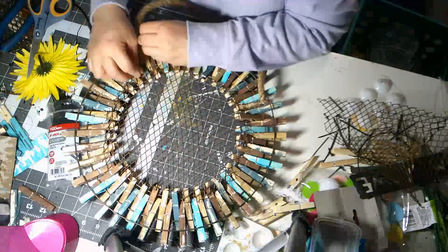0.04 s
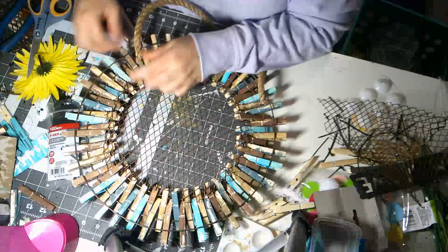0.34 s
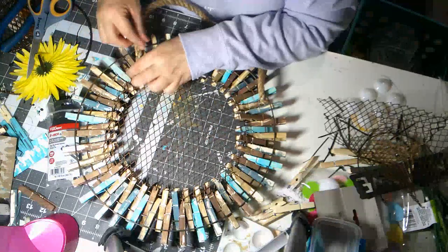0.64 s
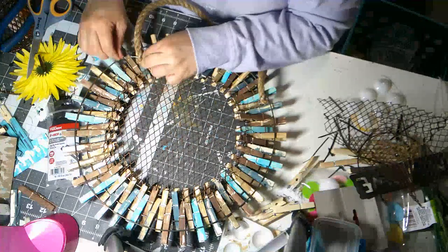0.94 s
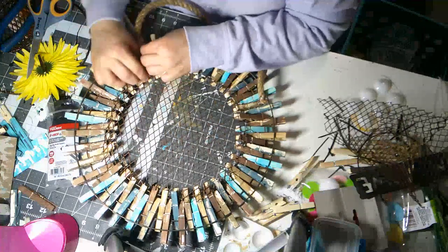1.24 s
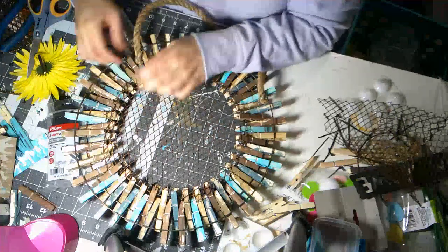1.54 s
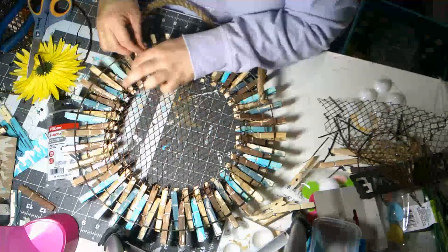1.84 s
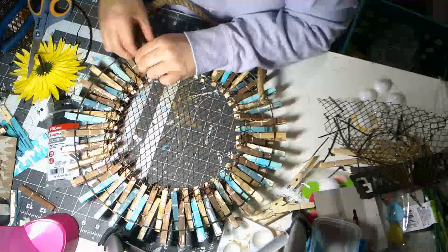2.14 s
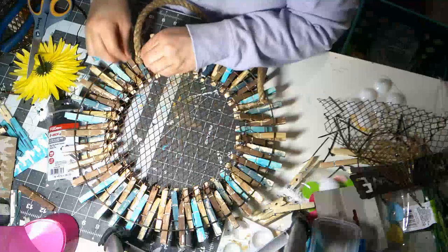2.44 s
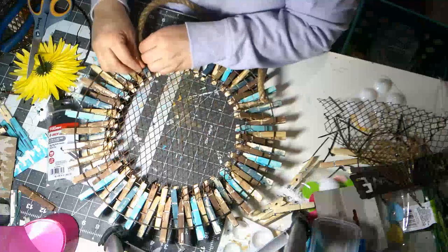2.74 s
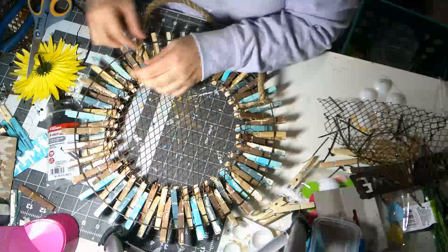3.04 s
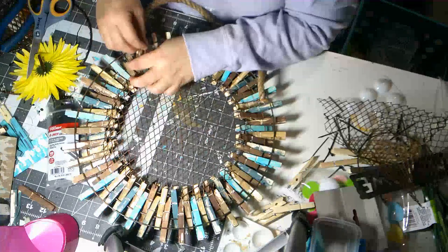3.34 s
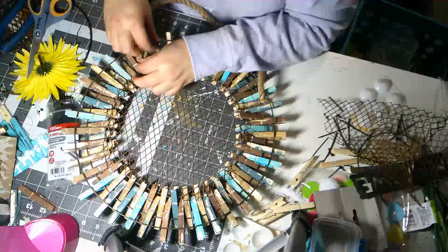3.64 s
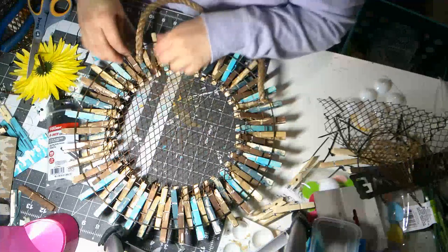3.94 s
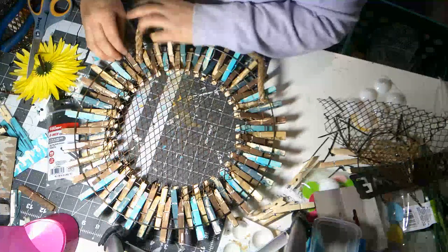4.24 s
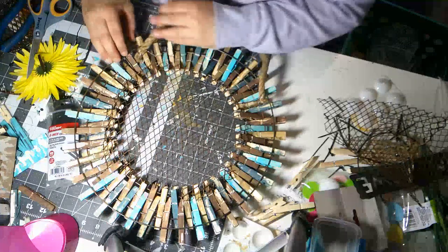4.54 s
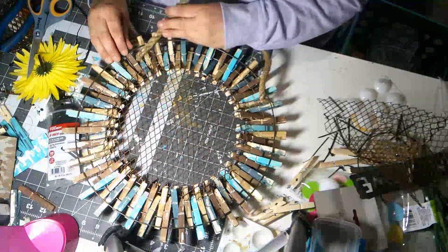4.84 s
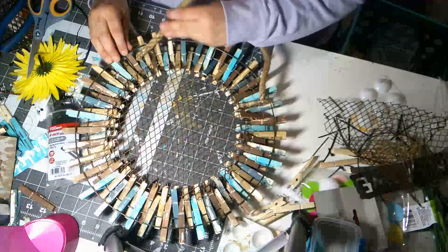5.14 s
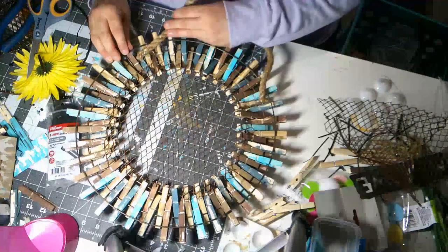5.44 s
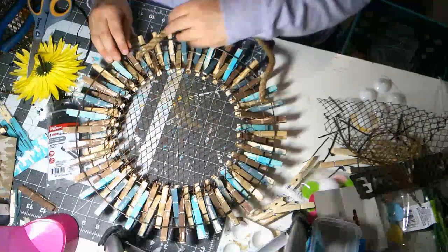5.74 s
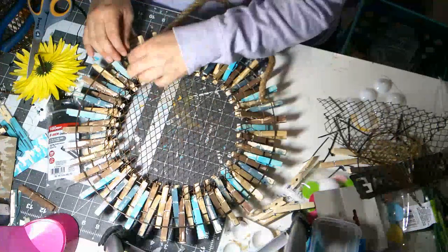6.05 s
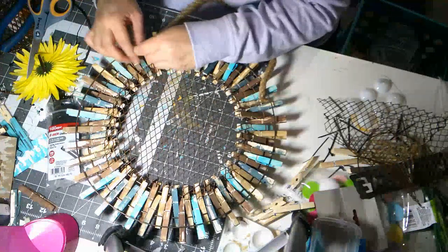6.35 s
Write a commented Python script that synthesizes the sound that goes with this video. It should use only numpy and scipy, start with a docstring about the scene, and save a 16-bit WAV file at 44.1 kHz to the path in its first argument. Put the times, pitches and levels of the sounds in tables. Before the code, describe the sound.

Hands weave a rope between wooden clothespins on a wire ring. The pegs give small hollow knocks and dry clicks in irregular clusters, with faint spring ticks, while the ring bumps dully on the table. Between the knocks, the rope rubs softly and the rocking ring rumbles. The room is small and quiet, with a low murmur, and the microphone sounds dull, with a thin hiss.

```python
"""Dull bumps and small wooden clacks sound in a small room: hands weave a rope between clothespins
clipped to a wire ring on a work table. The ring bumps the table top and excites its low modes;
the pegs collide and ring briefly, and their steel springs tick. The rope rubs along the wood by
stick-slip friction while the ring rocks. Under it all lie a low room murmur and a thin electronic hiss."""
import sys
import numpy as np
from scipy import signal
from scipy.fft import rfft, irfft, next_fast_len
from scipy.io import wavfile
from scipy.ndimage import uniform_filter1d

SR = 44100
rng = np.random.default_rng(int(sys.argv[2]) if len(sys.argv) > 2 else 0)


def transcribe(u):
    """Save the signal u as a 16-bit wav file named by the first command-line argument.

    u: samples, shape (n,) or (channels, n), limited to [-1, 1]; the rate is SR.
    q: integer samples, one column per channel.
    """
    v = np.clip(np.atleast_2d(u).T, -1, 1)
    q = np.round(v * 32767).astype(np.int16)
    wavfile.write(sys.argv[1], SR, q)


N = 291177
TIME = np.arange(N) / SR
ROOM_T60_S = 0.27


# Ring and hands bump the table. Each row: time in seconds, level of the push in dB,
# contact frequency in Hz (low is soft and slow), decay of the judder in cycles.
TABLE_BUMPS = [(0.592, -47, 242, 1.5), (0.853, -37, 63, 1.15), (0.903, -39, 214, 1.3),
               (0.933, -40.5, 106, 0.36), (1.064, -36.5, 71.4, 0.51), (1.118, -22.5, 68.2, 0.23),
               (1.121, -28.5, 211, 0.55), (1.287, -39.5, 82.6, 0.96), (1.86, -42, 191, 1),
               (1.93, -29.5, 189.6, 2.15), (1.969, -38, 73.4, 6.5), (2.026, -44.5, 199, 2),
               (2.456, -30, 422, 2.5), (2.465, -30.5, 229, 0.23), (2.493, -28.5, 63, 0.91),
               (2.528, -25, 64, 0.5), (2.481, -39, 400, 0.68), (2.532, -40.5, 252, 1.7),
               (2.815, -42.5, 245.5, 4.6), (3.049, -54, 214, 5.3), (3.103, -51, 204, 1.4),
               (3.42, -42.5, 131, 0.29), (3.757, -41.5, 210, 0.41), (3.779, -43, 64, 3.2),
               (3.853, -36, 123, 0.73), (3.869, -42, 253, 0.64), (4.184, -33, 231, 0.27),
               (4.228, -40.5, 73.8, 2.4), (4.36, -44.5, 234, 1.8), (4.506, -43.5, 215, 0.88),
               (4.676, -34.5, 166, 1.4), (4.687, -37, 84.6, 1.8), (5.323, -37.5, 184, 1.1),
               (5.336, -35.5, 150, 0.79), (5.352, -30, 65, 1.6), (5.383, -44, 139, 1.5),
               (5.56, -21.5, 232, 0.16), (5.561, -37, 440, 0.52), (6.119, -48, 318, 6.1),
               (6.198, -40.5, 258, 1.7), (6.216, -41, 66, 2.7), (6.272, -48, 310, 2)]
def bumps():
    """Soft impact: the air follows the acceleration of a bell-shaped push; then the wire ring judders."""
    push = np.zeros(N)
    for s, db, hz, judder_cycles in TABLE_BUMPS:
        near = (TIME > s - .05) & (TIME < s + .4)
        cycles = np.maximum((TIME[near] - s) * hz, -2)
        exponent = (np.pi * cycles) ** 2
        acceleration = (1 - 2 * exponent) * np.exp(-exponent)
        onset = (1 + np.tanh(2 * np.pi * (cycles - .5))) / 2
        judder = onset * np.cos(2 * np.pi * cycles) * np.exp(-cycles / max(judder_cycles, 1 / 4))
        push[near] += from_db(db) * (acceleration + judder)
    reflections = unit_energy(rng.standard_normal(SR // 2) * decay(ROOM_T60_S) * (1 - decay(0.05)))
    return table_top(push) + from_db(-1.0) * convolve(push, reflections)


# Modes of the table top. Each row: frequency in Hz, gain in dB, time to decay by 60 dB (T60) in seconds.
TABLE_MODES = [(64.7, 0.5, 0.84), (111, -11, 0.66), (127.9, 11, 0.33), (171.7, 3, 0.13), (201.8, 1.5, 0.2),
               (232.1, 8, 0.35), (313.6, 3, 0.24), (333, -7, 0.3), (399.5, 3.5, 0.16), (523.6, 1.5, 0.2)]
def table_top(force):
    """Forced vibration: the top passes a push on directly and resonates at each of its modes."""
    out = force.copy()
    for hz, db, t60 in TABLE_MODES:
        radius = np.exp(-np.log(1000) / (t60 * SR))
        gain = (1 - radius ** 2) / 2
        feedback = [1, -2 * radius * np.cos(2 * np.pi * hz / SR), radius ** 2]
        out += from_db(db) * signal.lfilter([gain, 0, -gain], feedback, force + 1e-18)
    return out


# A clack is a graze, the firm hit, and the peg falling back against its neighbour.
# Each row: time after the hit in seconds, level offset in dB.
CLACK_CONTACTS = [(-0.02, -24), (0, -3), (0.019, -16)]
# Pegs collide. Each row: time in seconds, base levels of hollow knock and dry click in dB, swell in
# seconds (short is a hit, long a scuff), spring tick as a share of the click, peg pitch in Hz,
# base level of its prongs in dB, cutoffs of the click and of the knock in Hz (low is a soft contact).
PEG_CLACKS = [(0.060, -59.5, -84, 0.0048, 0.15, 2190, -92, 3200, 1190),
              (0.120, -61.5, -75, 0.0036, 0.1, 2250, -78, 3000, 1000),
              (0.538, -60, -81, 0.005, 0.05, 1480, -83, 3000, 960),
              (0.568, -66, -75, 0.0053, 0.054, 1470, -69, 3020, 1000),
              (0.600, -57, -73, 0.006, 0.05, 1500, -64, 3270, 1110),
              (0.617, -52, -79, 0.0031, 0.05, 2170, -74, 3230, 1220),
              (0.640, -61.5, -81, 0.005, 0.05, 1463, -72, 3000, 1000),
              (0.896, -51.5, -71, 0.003, 0.29, 2350, -82, 3650, 890),
              (1.073, -56, -82, 0.0025, 0.05, 1900, -86, 3000, 1000),
              (1.113, -47, -66, 0.004, 0.11, 2740, -78, 3480, 1410),
              (1.140, -56.5, -77, 0.0035, 0.4, 2710, -79, 3300, 1020),
              (1.203, -60.5, -77, 0.011, 0.12, 2810, -76, 3440, 1000),
              (1.272, -60, -78, 0.0036, 0.45, 2370, -76, 4000, 1000),
              (1.286, -58, -68.5, 0.0051, 0.21, 2640, -74, 4400, 1000),
              (1.765, -52.5, -83, 0.0025, 0.05, 2100, -83, 3000, 950),
              (1.804, -74, -73, 0.0046, 0.4, 4100, -86, 4700, 1010),
              (1.850, -55.5, -83, 0.0025, 0.29, 3640, -86, 4540, 980),
              (1.898, -53, -71, 0.0016, 0.059, 2020, -92, 2970, 1000),
              (1.924, -44, -63, 0.0051, 0.11, 1935, -63.5, 3330, 900),
              (1.944, -45.5, -72, 0.0031, 0.046, 1920, -69, 2800, 900),
              (2.438, -57.5, -71, 0.0037, 0.046, 2310, -73, 3300, 1000),
              (2.452, -44.5, -65.5, 0.0035, 0.03, 3640, -78, 3700, 1700),
              (2.466, -45.5, -69, 0.003, 0.034, 2210, -64, 3600, 1600),
              (2.480, -51, -68.5, 0.0023, 0.027, 1956, -67, 3380, 1300),
              (2.526, -56.5, -76, 0.0025, 0.056, 2220, -71.5, 3000, 1200),
              (2.660, -59.5, -82, 0.0045, 0.05, 2200, -87, 3020, 900),
              (2.800, -55, -79, 0.0035, 0.05, 2300, -77, 3140, 910),
              (3.412, -52, -61.5, 0.0015, 0.28, 2480, -67, 3700, 1400),
              (3.419, -50, -64, 0.003, 0.25, 2580, -71, 3220, 1390),
              (3.438, -54, -78, 0.0041, 0.091, 2210, -79, 3030, 1000),
              (3.523, -53, -89, 0.0051, 0.15, 1500, -81, 3780, 1050),
              (3.754, -57, -86, 0.003, 0.046, 2040, -89, 3000, 940),
              (3.811, -51.5, -71.5, 0.0035, 0.1, 4160, -86, 4300, 1200),
              (3.845, -56, -71, 0.001, 0.22, 2060, -74, 4500, 1000),
              (3.852, -45, -68.5, 0.0013, 0.08, 3000, -75, 3900, 1590),
              (3.988, -56, -82, 0.0036, 0.05, 2020, -87, 3000, 900),
              (4.222, -60, -82, 0.0053, 0.091, 1470, -73, 3300, 1100),
              (4.355, -53, -74, 0.0018, 0.1, 1490, -75, 3420, 1040),
              (4.477, -55, -73, 0.003, 0.34, 1980, -88, 3400, 980),
              (4.665, -60, -76, 0.0029, 0.6, 2170, -78, 4000, 1000),
              (4.674, -48.5, -70, 0.004, 0.12, 1990, -80, 3200, 900),
              (4.688, -48.5, -65, 0.0045, 0.13, 2600, -78, 3400, 950),
              (4.702, -52.5, -66.5, 0.0047, 0.15, 2110, -71, 3200, 1020),
              (5.128, -54, -73, 0.0038, 0.1, 1920, -87, 3000, 1100),
              (5.146, -57, -84.5, 0.0041, 0.05, 2100, -84, 2980, 1100),
              (5.216, -61, -78, 0.0032, 0.49, 2000, -89, 3200, 950),
              (5.316, -53, -71, 0.0029, 0.06, 1570, -82, 3180, 960),
              (5.341, -47.5, -68, 0.0042, 0.08, 2120, -73, 3170, 960),
              (5.557, -55, -81, 0.00092, 0.1, 1990, -88, 3000, 846),
              (6.018, -64, -84, 0.003, 0.05, 1970, -85, 3000, 950),
              (6.108, -53, -71, 0.005, 0.35, 2250, -75, 3370, 960),
              (6.193, -53.5, -74, 0.0026, 0.39, 2900, -77, 3430, 1010)]
def clacks():
    """Impact excitation: each flurry sets the hollow ring, the dry wood and one peg's prongs ringing."""
    out, loud_part = np.zeros(N), slice(0, SR // 25)
    for s, knock_db, click_db, swell_s, _, pitch_hz, prong_db, click_top_hz, knock_top_hz in PEG_CLACKS:
        for delay_s, drop_db in CLACK_CONTACTS:
            touches = flurry(swell_s)
            responses = peg_knock(knock_top_hz), peg_click(click_top_hz), prongs(pitch_hz)
            for response, db in zip(responses, (knock_db, click_db, prong_db)):
                sound = convolve(touches, response)
                add(out, s + delay_s - swell_s, from_db(db + drop_db) * sound / np.std(sound[loud_part]))
    return out


def flurry(swell_s, per_s=1200):
    """Sliding contact: tiny impulses swell and die away as one peg slides off another."""
    age = TIME[:SR // 2] / np.clip(swell_s, .001, .03)
    touching = rng.random(len(age)) < per_s / SR
    touches = touching * rng.choice([-1, 1], len(age)) * age * np.exp(1 - age)
    touches[np.argmin(abs(age - 1))] += 1.6   # one firm touch at the crest
    return touches


# Clear modes of the pegs on the ring. Each row: frequency in Hz, relative level in dB, T60 in seconds.
KNOCK_MODES = [(529.4, -1.5, 0.23), (565, -5, 0.11), (665.9, 2, 0.2), (708.7, -1.5, 0.2), (770, -0.5, 0.17),
               (836, -11, 0.09), (1038, -16, 0.08)]
# Spectrum of their dense modes. Each row: frequency in Hz, relative level in dB.
KNOCK_SPECTRUM = [(150, -26.5), (300, -2), (550, -2.5), (720, 3.5), (880, -6.5), (1050, -12), (1400, -22.5),
                  (2200, -35)]
def peg_knock(top_hz=1070):
    """Impulse response of the pegs and the ring that carries them: a hollow knock."""
    clear = clear_modes(KNOCK_MODES, vary_db=2, detune=0.012)
    dense = from_db(1.5) * dense_modes(KNOCK_SPECTRUM, t60=0.17, room_db=-0.5)
    return softened(clear + dense, top_hz, order=4)


# Clear upper modes of the wood. Each row: frequency in Hz, relative level in dB, T60 in seconds.
CLICK_MODES = [(1484, 1, 0.089), (1806, -2, 0.19), (1982, 0.5, 0.11), (2260, -4, 0.078), (2550, -1, 0.032),
               (2770, 2.5, 0.15), (3540, -6, 0.05)]
# Spectrum of its dense modes. Each row: frequency in Hz, relative level in dB.
CLICK_SPECTRUM = [(700, -23.5), (1200, 4), (1600, 4), (2000, 6), (2700, -1), (3200, -6.5), (3900, -9),
                  (4700, -13.5), (7000, -31)]
def peg_click(top_hz=3900):
    """Damping: the upper modes of the wood die quickly, which gives a dry click."""
    clear = clear_modes(CLICK_MODES, vary_db=3, detune=0.015)
    dense = from_db(10.0) * dense_modes(CLICK_SPECTRUM, t60=0.044, room_db=2.0)
    return softened(clear + dense, top_hz, order=10)


# Modes of a peg's prongs. Each row: multiple of the peg's pitch, relative level in dB, T60 in seconds.
PRONG_MODES = [(1, 6.5, 0.088), (0.96, 1.5, 0.043), (1.17, -12, 0.092), (1.3, -14, 0.025)]
def prongs(pitch_hz):
    """Free vibration: each struck peg has a woody note of its own."""
    modes = [(pitch_hz * multiple, db, t60) for multiple, db, t60 in PRONG_MODES]
    return clear_modes(modes, vary_db=0.0, detune=0.0064)


def clear_modes(modes, vary_db, detune):
    """Modal superposition: no two pegs are tuned alike; strength and sign vary with where a blow lands."""
    t, out = TIME[:SR // 2], 0
    for hz, db, t60 in modes:
        strength = rng.choice([-1, 1]) * from_db(db + vary_db * rng.standard_normal())
        tuned_hz = hz * (1 + detune * rng.standard_normal())
        out = out + strength * np.sin(2 * np.pi * tuned_hz * t) * decay(t60)
    return unit_energy(out)


def dense_modes(spectrum, t60, room_db):
    """Modal overlap: countless modes merge into noise, strongest at first, then the room's tail."""
    direct = from_db(3) * decay(0.014)
    envelope = direct + decay(t60) + from_db(room_db) * decay(ROOM_T60_S)
    return unit_energy(noise(spectrum, size=SR // 2) * envelope)


def softened(x, top_hz, order):
    """Contact compliance: wood gives way, which takes the treble off a blow."""
    return unit_energy(signal.sosfilt(signal.butter(order, top_hz, fs=SR, output="sos"), x))


# Spectrum of a spring's tick. Each row: frequency in Hz, relative level in dB.
SPRING_SPECTRUM = [(1500, -15.5), (2800, 10), (3900, 7), (4900, -9.5), (6400, 11), (7500, 7.5),
                   (8300, -0.5), (9000, -20)]
def spring_ticks():
    """Sliding friction: as a peg clacks, its steel spring slips in its groove."""
    out = np.zeros(N)
    for s, _, click_db, swell_s, share, *_ in PEG_CLACKS:
        tick = convolve(flurry(swell_s), dense_modes(SPRING_SPECTRUM, t60=0.015, room_db=-10.5))
        add(out, s - swell_s, share * from_db(click_db) * tick / np.std(tick[:SR // 60]))
    return out


# How hard the hands work the rope. Each row: time in seconds, relative level in dB.
HAND_EFFORT = [(0.0, -51.5), (0.289, -68.5), (0.92, -62), (1.121, -53), (1.42, -63.5), (1.669, -66.5),
               (1.89, -56.5), (2.2, -60.5), (2.65, -57), (3.09, -66.5), (3.38, -62), (3.66, -58.5),
               (4.19, -60), (4.39, -55.5), (4.93, -58), (5.48, -57), (5.72, -63.5), (6.6, -58.5)]
def handling():
    """Rocking and rubbing grow with effort and with each tug; the two contributions add in power."""
    s, effort_db = np.transpose(HAND_EFFORT)
    swing_db = np.interp(TIME, s, effort_db - effort_db.mean())
    tug, rub = tugs(), from_db(-64.5 + swing_db)
    rock = np.hypot(from_db(-50 + 1.15 * swing_db), from_db(15.5) * tug)
    drag = np.hypot(rub, from_db(-1.5) * tug)
    hollow = np.hypot(from_db(-5.5) * rub, tug)
    scratch = np.hypot(from_db(-78 + 0.26 * swing_db), from_db(-18.5) * tug)
    return (rock * ring_rocking() + drag * table_drag()
            + hollow * rope_rub(peg_knock, per_s=200) + scratch * rope_rub(peg_click, per_s=250))


# Tugs of the rope over the pegs. Each row: crest time in seconds, length in seconds, hollow rub in dB.
ROPE_TUGS = [(0.07, 0.027, -64), (0.607, 0.13, -61), (1.208, 0.077, -63), (1.79, 0.28, -63),
             (2.293, 0.027, -62.5), (2.827, 0.045, -62), (3.538, 0.17, -64.5), (3.784, 0.16, -62),
             (4.225, 0.13, -57.5), (4.388, 0.063, -64), (4.514, 0.11, -59.5), (5.126, 0.07, -67),
             (6.033, 0.022, -62.5)]
def tugs(rise_share=0.58):
    """Amplitude envelope of the tugs: each swells to its crest and fades a little faster."""
    gain = np.zeros(N)
    for s, length_s, db in ROPE_TUGS:
        width_s = length_s * np.where(TIME < s, rise_share, 1 - rise_share)
        gain += from_db(db) * np.exp(-((TIME - s) / width_s) ** 2)
    return gain


# Spectrum of the rocking ring's force. Each row: frequency in Hz, relative level in dB.
ROCKING_SPECTRUM = [(15, -13), (27, 2.5), (48, 7), (66, 6), (90, -8), (130, -13), (200, -16), (300, -14),
                    (450, -45.5), (800, -65)]
def ring_rocking():
    """Random forcing: the ring rocks on the table top and makes it rumble."""
    rumble = rms_one(table_top(noise(ROCKING_SPECTRUM)))
    local_power = uniform_filter1d(rumble ** 2, SR // 12)
    return rumble / np.sqrt(local_power + 0.013)   # the hands keep a fairly even pressure


def table_drag():
    """Frictional excitation: small slips drive the table top, heard in its upper modes."""
    band = signal.butter(2, [190, 520], "band", fs=SR, output="sos")
    return rms_one(signal.sosfilt(band, table_top(slips(per_s=700, spread_db=4.0))))


def rope_rub(response, per_s, pegs=4):
    """Superposition: the rope slips over several pegs at once, each with its own response."""
    return rms_one(sum(convolve(slips(per_s, spread_db=3.2), response()) for _ in range(pegs)))


def slips(per_s, spread_db):
    """Stick-slip friction: random tiny jerks of very uneven size."""
    sizes = from_db(spread_db * np.minimum(rng.exponential(1, N), 4))
    return sizes * rng.choice([-1, 1], N) * (rng.random(N) < per_s / SR)


# Spectrum of the room's murmur. Each row: frequency in Hz, relative level in dB.
ROOM_SPECTRUM = [(15, -26.5), (27, 12), (62, -4), (110, -1), (220, -17.5), (480, -27.5), (700, -24),
                 (1080, -29), (1900, -35.5), (2750, -40.5), (3700, -48), (4700, -61), (9000, -80.5)]
def room_murmur():
    """Ambient noise: steady, with most of its power in the bass."""
    return from_db(-52) * noise(ROOM_SPECTRUM)


# Spectrum of the microphone's hiss. Each row: frequency in Hz, relative level in dB.
HISS_SPECTRUM = [(3000, -24), (4800, -27), (5500, -13.5), (6600, -12.5), (7000, -7), (7300, -0.5),
                 (7700, -10.5), (8600, -26), (9000, -55)]
# Steady electronic tones. Each row: frequency in Hz, rms level in dB.
WHINE_TONES = [(5170, -107), (6198, -99)]
def microphone_noise():
    """Self-noise: the microphone adds a thin hiss and a faint whine."""
    whine = sum(from_db(db) * np.sqrt(2) * np.sin(2 * np.pi * hz * TIME) for hz, db in WHINE_TONES)
    return from_db(-85.5) * noise(HISS_SPECTRUM) + whine


def noise(spectrum, size=N):
    """Spectral shaping: white noise takes on the given colour, at rms 1."""
    hz, db = np.transpose(spectrum)
    length = next_fast_len(size)
    bin_hz = np.maximum(np.fft.rfftfreq(length, 1 / SR), 1)
    gain = from_db(np.interp(np.log(bin_hz), np.log(hz), db))
    return rms_one(irfft(rfft(rng.standard_normal(length)) * gain, length)[:size])


def decay(t60):
    """Half a second of exponential decay."""
    return np.exp(-np.log(1000) * TIME[:SR // 2] / t60)


def convolve(x, response):
    """Pass a signal through an impulse response."""
    return signal.fftconvolve(x, response)[:len(x)]


def add(out, s, sound):
    """Superpose a short sound at s seconds."""
    start = int(np.clip(s * SR, 0, N - 1))
    out[start:start + len(sound)] += sound[:N - start]


def from_db(db):
    """Decibels to amplitude ratio."""
    return 10 ** (np.asarray(db) / 20)


def rms_one(x):
    """Scale to rms 1."""
    return x / np.sqrt(np.mean(x ** 2) + 1e-30)


def unit_energy(x):
    """Scale to total energy 1."""
    return x / np.sqrt(np.sum(x ** 2) + 1e-30)


def scene():
    """Superposition: the sounds of weaving and the room's murmur add in one channel."""
    return (bumps() + clacks() + spring_ticks() + handling() + room_murmur())[None]


def record(dry):
    """Band limiting: a dull microphone loses the treble; the electronics add faint hiss and cut the top."""
    mic_lowpass = signal.ellip(10, .1, 80, 8740, fs=SR, output="sos")
    final_lowpass = signal.ellip(10, .1, 80, 16000, fs=SR, output="sos")
    picked_up = signal.sosfilt(mic_lowpass, dry + microphone_noise())
    white_hiss = from_db(-96.5) * rng.standard_normal(N)
    return signal.sosfilt(final_lowpass, picked_up + white_hiss)


dry = scene()
out = record(dry)
transcribe(out)
```